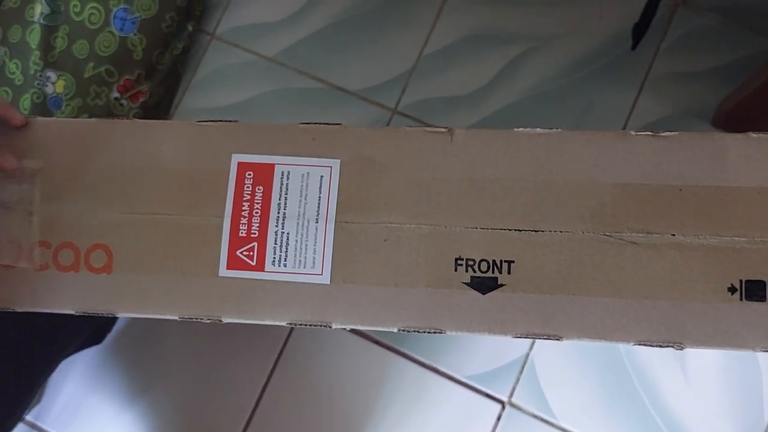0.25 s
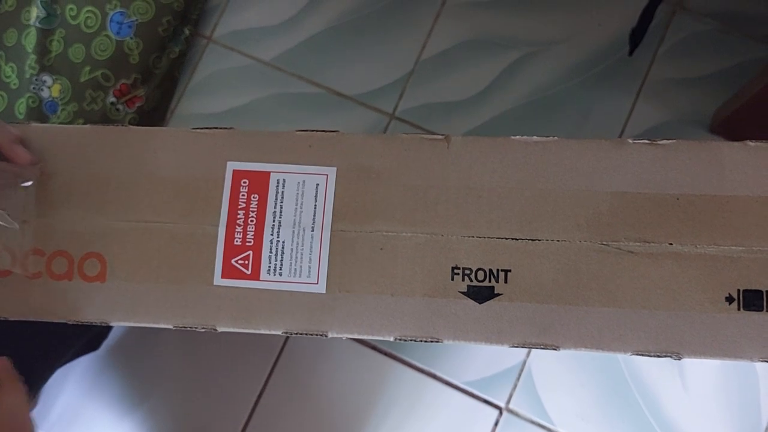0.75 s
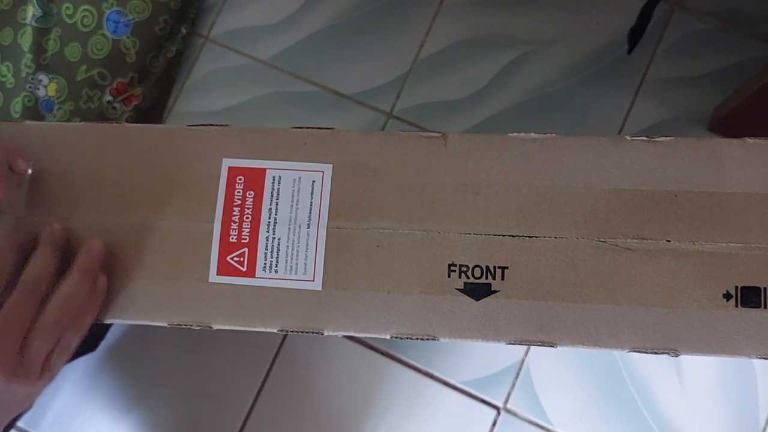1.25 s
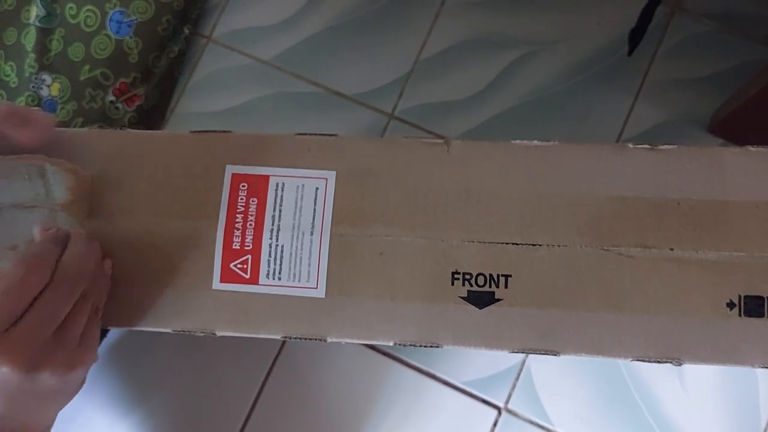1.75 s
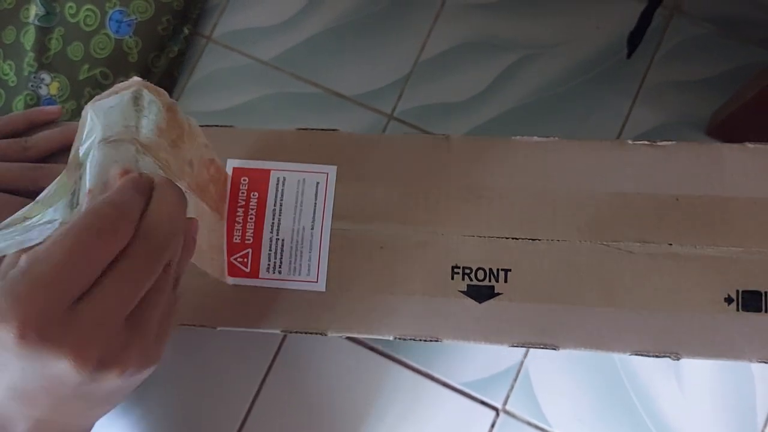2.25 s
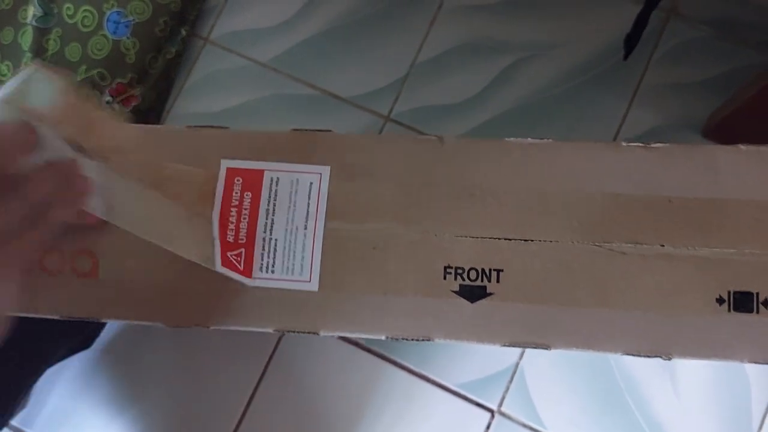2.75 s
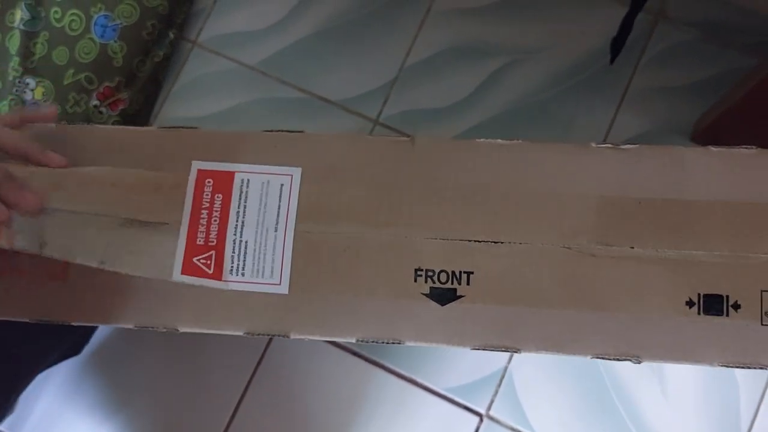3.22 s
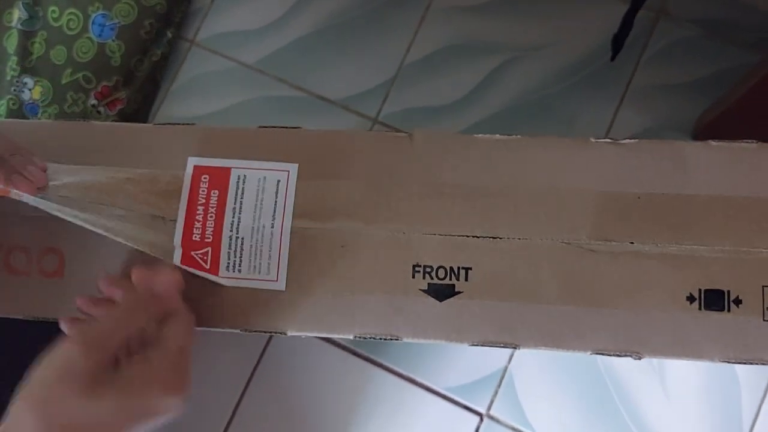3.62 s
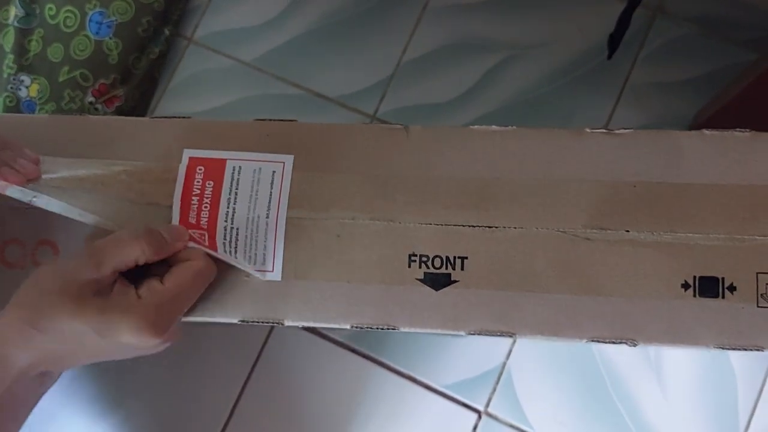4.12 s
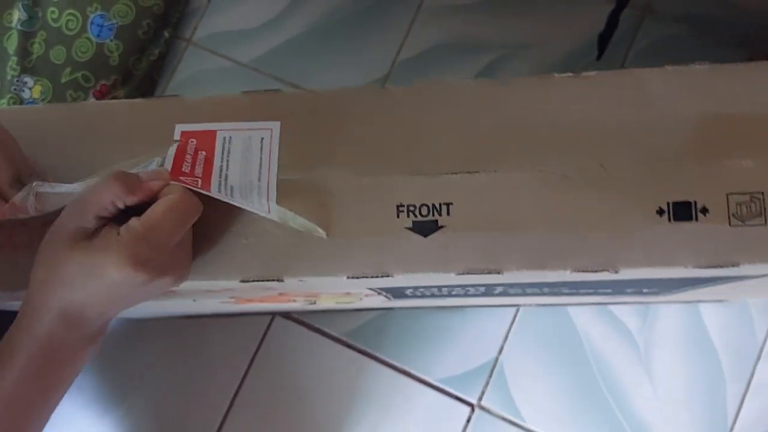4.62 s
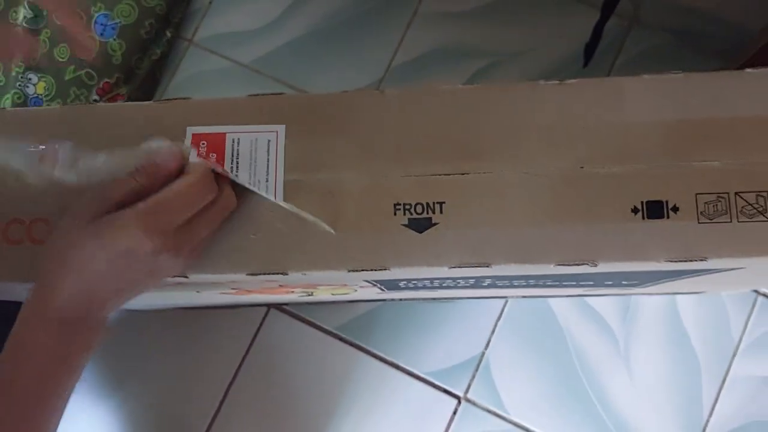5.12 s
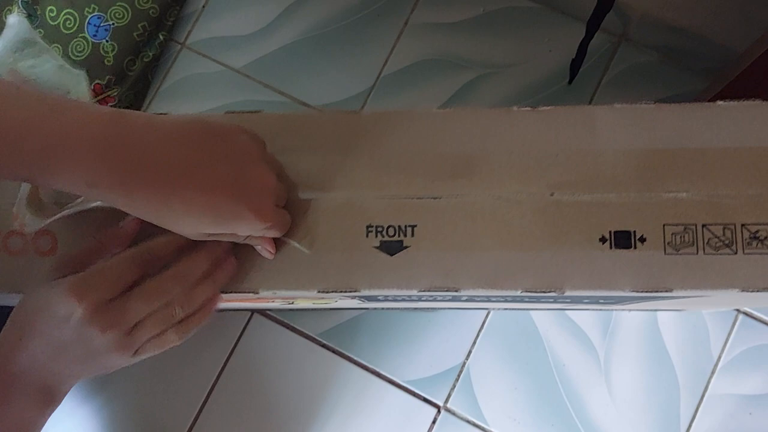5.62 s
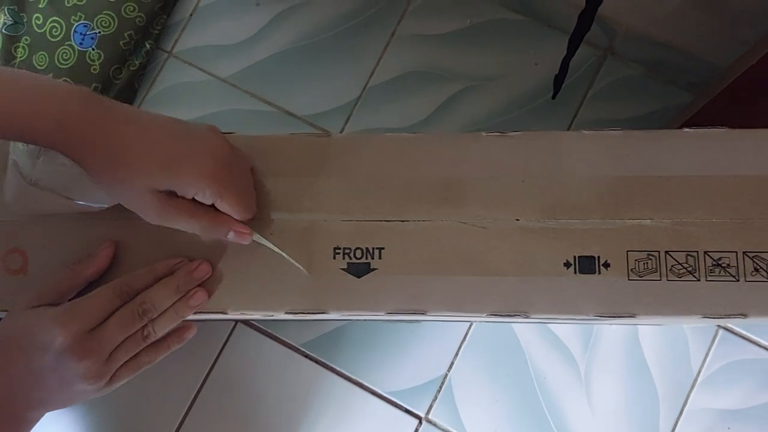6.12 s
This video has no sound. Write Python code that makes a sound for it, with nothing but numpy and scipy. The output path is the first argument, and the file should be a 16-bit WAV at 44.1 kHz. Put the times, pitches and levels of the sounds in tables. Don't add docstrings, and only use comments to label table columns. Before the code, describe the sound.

Packing tape crackles and is ripped in two loud bursts off a hollow cardboard box, then peeled in shorter pulls, in a tiled room.

```python
import sys
import numpy as np
from scipy import signal
from scipy.fft import rfft, irfft
from scipy.io import wavfile
from scipy.ndimage import uniform_filter1d

SR = 44100
rng = np.random.default_rng(int(sys.argv[2]) if len(sys.argv) > 2 else 0)


def makeup_ratio(level_db):
    decades = np.asarray(level_db, float) / 20
    return 10 ** decades


def file_out(sig):
    cols = np.atleast_2d(sig).T
    lim = np.clip(cols, -1, 1)
    pcm = np.round(lim * 32767).astype(np.int16)
    wavfile.write(sys.argv[1], SR, pcm)


N = 280917


def evened(x):
    return x / np.sqrt(np.mean(x ** 2) + 1e-20)


def smoothed(x, first, second, axis=-1):
    return uniform_filter1d(uniform_filter1d(x, first, axis), second, axis)


def read(points, hz):
    f, value = np.transpose(points)
    return np.interp(np.log(hz + 1), np.log(f + 1), value)


def follow(points, t):
    return np.interp(t, *np.transpose(points))


def add(mix, s, sound):
    part = mix[round(s * SR):][:len(sound)]
    part += sound[:len(part)]


def ring(x, modes):
    t = np.arange(8192) / SR
    body = np.zeros(len(t))
    for hz, width, db in modes:
        decay = np.exp(-np.pi * width * t)
        body += makeup_ratio(db) * np.sqrt(width) * decay * np.sin(2 * np.pi * hz * t)
    return signal.oaconvolve(x, body / np.linalg.norm(body))[:N]


def colour(x, points):
    gain_db = read(points, abs(np.fft.fftfreq(4096, 1 / SR)))
    log_gain = np.log(makeup_ratio(np.maximum(gain_db, -70)))
    taps = np.fft.ifft(np.exp(np.conj(signal.hilbert(log_gain)))).real[:2048]
    return signal.oaconvolve(x, taps / np.linalg.norm(taps))[:N]


# frequency in Hz, level in dB per Hz.
RUMBLE_SPECTRUM = [(18, -41), (40, -12.5), (133, 0), (173, -12.5), (243, -10), (350, -21.5), (560, -34),
                   (1290, -37.5), (2360, -48.5), (3490, -48.5), (14000, -46), (15500, -44.5)]
# frequency in Hz, width in Hz, lift in dB.
AIR_MODES = [(66.7, 23, 13.5), (108, 13, 4.5)]
# frequency in Hz, likeness (1 is the same).
PORT_LIKENESS = [(60, 0.93), (180, 0.75), (550, 0.5), (1650, 1), (4970, 6), (15000, -2)]
# time in seconds, level in dB.
RUMBLE_SWELL = [(0, -0.5), (.3, 1), (.9, -1.5), (1.4, -2), (2.1, -0.5), (2.6, -6.5), (3.1, -1), (3.6, 0.5),
                (4.198, 0), (4.9, 0), (5.15, 0.5), (5.7, 2), (6.1, -1.5), (6.37, 3)]


def rumble():
    level_db, patch_db = -50.5, 1.1
    hz = np.fft.rfftfreq(2048, 1 / SR)
    a, b, c, d, patches = rng.standard_normal((N // 512 + 6, len(hz), 5)).T
    patches = evened(smoothed(smoothed(patches, 6, 1, 0), 6, 1, 1))
    same = np.clip(read(PORT_LIKENESS, hz), -1, 1)[:, None]
    left = a + 1j * b
    right = same * left + np.sqrt(1 - same ** 2) * (c + 1j * d)
    lift_db = sum(db * np.exp(-((hz - f) / width) ** 2) for f, width, db in AIR_MODES)
    gain = makeup_ratio((read(RUMBLE_SPECTRUM, hz) + lift_db)[:, None] + patch_db * patches)
    noise = signal.istft(np.array([left, right]) * gain, nperseg=2048, noverlap=1536)[1][:, :N]
    return makeup_ratio(level_db + follow(RUMBLE_SWELL, np.arange(N) / SR)) * evened(noise)


# frequency in Hz, t60 in seconds.
ROOM_T60 = [(100, 0.21), (500, 0.36), (2000, 0.24), (6000, 0.2), (15000, 0.011)]
# delay in ms, level in dB.
TILE_ECHOES = [
    [(.6, -25), (2.0, -13), (3.7, 3), (5.6, -3), (9, -30.5)],
    [(.9, -1.5), (1.7, 10.5), (3.1, -29), (6.3, 1.5), (8, 1.5)],
]


def room(x):
    tail_db, echo_db = -11, -10
    taps = np.zeros((2, SR // 2))
    slots = np.arange(300, SR // 2 - 20, 20)
    at = slots + rng.integers(0, 20, (2, len(slots)))
    np.put_along_axis(taps, at, rng.choice([-1., 1.], at.shape), 1)
    hz, t, z = signal.stft(taps, SR, nperseg=256)
    tail = signal.istft(z * makeup_ratio(-60 * t / read(ROOM_T60, hz)[:, None]), SR, nperseg=256)[1]
    tail *= makeup_ratio(tail_db) / np.linalg.norm(tail[0])
    for port, echoes in zip(tail, TILE_ECHOES):
        for ms, db in echoes:
            add(port, ms / 1000, makeup_ratio(np.array([db + echo_db])))
    bass = signal.lfilter(*signal.butter(1, 700, fs=SR), x)
    return signal.fftconvolve((x - bass)[None], tail, axes=1)[:, :N]


# start in seconds, peak in dB, push length in seconds.
THUMPS = [(1.364, -25, 0.0035), (1.597, -27.5, 0.0036), (1.639, -18, 0.0025), (1.879, -12.5, 0.0043),
          (1.932, -19, 0.0014), (1.944, -7, 0.0036), (1.979, -18, 0.0069), (2.842, -61.5, 0.0044),
          (3.329, -23, 0.0026), (3.599, -35.5, 0.0096), (4.377, -38.5, 0.0043), (4.858, -22, 0.0038),
          (4.9, -34, 0.0021), (4.868, -31, 0.0088), (4.888, -28, 0.0071), (4.955, -26, 0.0035),
          (5.188, -30.5, 0.0056), (5.418, -26.5, 0.0077), (5.43, -25.5, 0.0061), (5.674, -29, 0.0049),
          (5.746, -29.5, 0.0054)]
# start in seconds, pitch in Hz, level in dB, length in seconds.
SQUEAKS = [(2.235, 1140, -58, .04), (4.21, 1200, -60, .07), (3.06, 2300, -58, .09),
           (5.935, 2130, -59, .035), (5.975, 1760, -63, .06), (6.04, 1700, -67, .08),
           (5.52, 1850, -70, .045), (6.18, 1350, -66, .12), (3.192, 2350, -65, .014), (.42, 1800, -75, .1),
           (1.908, 1150, -30, .014), (4.555, 640, -57, .055)]
# frequency in Hz, width in Hz, level in dB.
BOOM_MODES = [(86, 60, 3.5), (116.2, 9.1, 5), (170, 28, -1.5), (245, 16, -10.5)]


def hands():
    push, squeak = np.zeros(N), np.zeros(N)
    for at, peak_db, length in THUMPS:
        in_then_out = np.sin(np.linspace(0, 2 * np.pi, max(round(length * SR), 20)))
        add(push, at, makeup_ratio(peak_db - 1.5) * in_then_out)
    for at, hz, db, length in SQUEAKS:
        skin = [(hz, 150, 0)]
        rub = evened(ring(ring(rng.standard_normal(9000), skin), skin))
        rub = rub[4000:][:round(length * SR)]
        add(squeak, at, makeup_ratio(db) * rub * signal.windows.tukey(len(rub), .6))
    return ring(push, BOOM_MODES) / 10 + squeak


# frequency in Hz, width in Hz, level in dB.
WALL_MODES = [(464, 28, 3.5), (492, 17, -4), (564, 36, 4.5), (632, 24, -5.5), (700, 130, -2.5),
              (870, 1400, 1.5)]
# frequency in Hz, width in Hz, level in dB.
HOLLOW_MODES = [(260, 30, -4), (300, 22, 0), (343, 22, 1), (395, 45, -13)]
# frequency in Hz, width in Hz, level in dB.
SLACK_HOLLOW_MODES = [(164, 19, -3.5), (218, 30, 0), (252, 27, 3), (280, 40, -4.5)]
# time in seconds, share from 0 to 1.
SLACK_SHARE = [(0, 0.64), (1.3, 0.4), (1.55, 0.65), (1.7, 0.64), (1.85, 0.57), (1.95, 0.06), (2.3, 0.16),
               (2.9, 0.97), (3.3, 0.48), (4.2, .8), (4.9, 0.7), (5.4, 0.97), (5.7, 0.46), (6.25, 1)]


def hollow_box(walls, hollow, shared, other):
    boom_db = -9
    slack = np.clip(follow(SLACK_SHARE, np.arange(N) / SR), 0, 1)
    no_bass = signal.butter(3, 240, "high", fs=SR, output="sos")
    firm = signal.sosfilt(no_bass, ring(hollow * shared, HOLLOW_MODES))
    loose = ring(np.sqrt(slack) * hollow * other, SLACK_HOLLOW_MODES)
    cavity = np.sqrt(1 - slack) * firm + loose
    return ring(walls * shared, WALL_MODES) + cavity + makeup_ratio(boom_db) * ring(hollow * shared, BOOM_MODES)


# frequency in Hz, width in Hz, level in dB.
FACE_MODES = [(1030, 91, 1.5), (1200, 81, 12), (1386, 360, 17.5), (1718, 120, 17.5), (1840, 380, 9),
              (2247, 250, 10), (2350, 140, 8)]
# frequency in Hz, width in Hz, level in dB.
LABEL_MODES = [(1520, 180, 9), (1774, 150, 15.5), (2085, 120, -4), (2660, 170, -30), (2780, 89, -27)]
# from and to, in seconds.
LABEL_REACHED = (5.3, 5.7)


def card_face(push):
    on_label = np.interp(np.arange(N) / SR, LABEL_REACHED, (0, 1))
    return ring(push * np.sqrt(1 - on_label), FACE_MODES) + ring(push * np.sqrt(on_label), LABEL_MODES)


# frequency in Hz, level in dB per Hz.
FILM_SPECTRUM = [(1350, -32), (2300, 2), (2470, -4.5), (3060, -7), (4150, -3), (5900, -8.5), (12200, -7),
                 (16000, -6.5)]


def plastic_film(film, sheen, shared, other):
    same = 0.4
    grains = np.array([shared, same * shared + np.sqrt(1 - same ** 2) * other])
    dull = signal.sosfiltfilt(signal.butter(2, 7000, fs=SR, output="sos"), grains)
    ports = [colour(film * low + sheen * (grain - low), FILM_SPECTRUM) for grain, low in zip(grains, dull)]
    return np.array(ports)


def flexed(x):
    depth_db = 2.1
    z = signal.stft(x, nperseg=256, noverlap=192)[2]
    field = rng.standard_normal(z.shape[1:])
    field = smoothed(smoothed(field, 3, 3, 0), 30, 30, 1)
    gain = makeup_ratio(depth_db * evened(field))
    return signal.istft(z * evened(gain), nperseg=256, noverlap=192)[1][:, :N]


def slips(per_s, spread_db, clump_db, hiss):
    size = makeup_ratio(spread_db * np.minimum(rng.exponential(1, N), 3))
    size = size * (rng.random(N) < per_s / SR)
    burst = np.exp(-np.arange(200) / (.0006 * SR))
    clumps = evened(smoothed(rng.standard_normal(N), 500, 300))
    grain = evened(signal.oaconvolve(size, burst)[:N])
    return (hiss + grain) / np.sqrt(hiss ** 2 + hiss + 1) * makeup_ratio(clump_db * clumps)


# start in seconds, peak in dB, top sheen in dB, t60 in seconds.
TICKS = [(0.171, -31, -2.5, 0.01), (0.2301, -22, -19, 0.057), (0.2698, -25, -27, 0.04),
         (0.29, -22, -8, 0.027), (1.4417, -51.5, 12, 0.024), (1.5438, -10, -33, 0.0091),
         (1.5751, -11.5, -20.5, .012), (2.1096, -51, 5, 0.085), (2.2609, -41.5, -6.5, 0.11),
         (2.918, -32.5, -9, 0.093), (2.99, -36.5, -32, .011), (3.041, -24.5, -13, 0.012),
         (3.1441, -29.5, -9, 0.011), (3.2962, -29, -25, 0.044), (3.8969, -34, 7, 0.0095),
         (4.3088, -24.5, -16, 0.047), (4.4694, -25, 0, 0.029), (4.774, -47, 2.5, 0.026),
         (4.7921, -37.5, 2, 0.02285), (4.8439, -32, -5.5, 0.074), (4.916, -19.5, -11.5, 0.012),
         (5.0414, -38, -3, 0.042), (5.091, -40, -14.5, 0.026), (5.2949, -40.5, -3.5, 0.092),
         (5.882, -40, -4, 0.017), (5.918, -37, 1, .022), (5.9799, -28, -30, 0.017),
         (6.0474, -34.5, -26, .02), (6.1835, -47, -29, .032), (6.218, -36.5, 0, 0.11)]
# start in seconds, peak in dB, top sheen in dB, card face share in dB.
SNAPS = [(0.144, -47, -8, -27), (0.2032, -40, -16, -6), (0.317, -27, -3.5, -24), (0.4842, -38, -14, -12.5),
         (0.5945, -39, -13, -17.5), (1.0313, -48, 1, -10.5), (1.418, -37.5, -0.5, -13), (1.481, -34, 0, -9),
         (1.596, -12, -2, -1), (1.648, -21.5, -1, -15), (1.803, -24, -24, -28), (1.852, -23, -8, -10),
         (1.88, -8.5, -38, -11), (2.578, -56, 6.5, -11), (2.945, -38, -14, -19), (3.014, -44, -6, -11),
         (3.193, -43, -7, -7), (3.2187, -27.5, -11, -25), (3.237, -35, -20, -15),
         (3.2506, -25.5, -20.5, -19.5), (3.9584, -46.5, -16, -12), (4.2216, -21, -36, -17),
         (4.37, -29, 2, -4), (4.513, -36.5, -1, -6.5), (4.627, -40.5, -3, -9), (4.8924, -22, -41, -23.5),
         (5.176, -38, -18, -12), (5.4165, -61, -25, -8)]
# start in seconds, peak in dB, top sheen in dB, hollow box share in dB.
KNOCKS = [(0.051, -26, 7.5, -7), (0.0738, -41.5, 13, 8), (0.385, -36.5, -7, -3), (0.632, -37, -16, -9),
          (1.0886, -45, -14, 0), (1.314, -49.5, -2, -4), (1.3755, -57.5, 12, 18), (1.4655, -38.5, 6, -7),
          (2.8998, -42, 2, 11), (3.3134, -13, -4, -3), (3.6174, -49.5, -2, -2), (3.79, -48.5, -19, 0),
          (4.074, -52, -35, -5), (4.2595, -28.5, -5, -4.5), (4.379, -23, -7, -5.5), (5.19, -38, 6.5, 0.5),
          (5.418, -46, -24, 16), (5.458, -47.5, 4, -1), (5.674, -24, -7, -1.5)]
# start in seconds, peak in dB, top
# sheen in dB.
CRACKLES = [(0.445, -53, -19), (.466, -42.5, -24), (0.877, -59, 5), (.9264, -63, -9), (1.0147, -61, -10),
            (1.057, -50, -7), (1.1674, -59, 6), (1.3006, -64, -2), (1.585, -12, -23), (1.602, -20, -1),
            (1.609, -31, -6), (1.7223, -35, -6), (1.7316, -35, -6), (1.868, -14, -22), (1.892, -16, -27),
            (1.915, -5, -20), (3.366, -29, -1), (3.381, -41, -5), (3.844, -46.5, -5), (4.3323, -33, 0),
            (4.403, -34, -8), (4.41, -28.5, -15), (4.466, -36, 4), (4.547, -29.5, -14), (4.57, -42, -18),
            (5.5477, -49, -12), (5.555, -46, -12), (5.6367, -43, 2), (3.548, -50.5, -13.5),
            (3.665, -47, -11.5), (3.754, -53, -15), (4.954, -40, -10), (5.066, -43, -9), (5.33, -57, -8),
            (5.69, -31, -16), (5.702, -35.5, -24), (5.713, -43, -24)]


def cracks():
    ticks = [(s, db, -24, -57.5, t60, sheen_db) for s, db, sheen_db, t60 in TICKS]
    snaps = [(s, db, face_db, -40.5, 0.017, sheen_db) for s, db, sheen_db, face_db in SNAPS]
    knocks = [(s, db, -17, box_db, 0.027, sheen_db) for s, db, sheen_db, box_db in KNOCKS]
    crackles = [(s, db, -14.5, -31, 0.017, sheen_db) for s, db, sheen_db in CRACKLES]
    return ticks + snaps + knocks + crackles


# time in seconds, effort in dB.
FIDGET = [(0, -64.5), (.45, -63), (.8, -81.5), (1.05, -73), (1.22, -90.5), (1.36, -64.5), (2.17, -57),
          (2.33, -62), (2.47, -88), (2.65, -84), (2.9, -61.5), (3.4, -75), (3.51, -78.5), (3.68, -68),
          (4.0, -63.5), (4.76, -63), (5.05, -59), (6.37, -77)]
# top in seconds, effort in dB, rise and fall in seconds, card lift in dB.
PICKS = [
    (0, -50.5, .01, 0.058, -30),
    (.06, -55, .005, 0.35, -32),
    (0.227, -40.5, 0.029, 0.09, -10),
    (.275, -44.5, 0.063, 0.11, -8),
    (.71, -70.5, .01, 0.13, -10),
    (.885, -73.5, 0.015, 0.27, -6),
    (1.16, -72, 0.38, 0.034, 2),
    (1.376, -64.5, 0.039, 0.011, -3),
]
# top in seconds, effort in dB, rise and fall in seconds, card lift in dB.
PULLS = [(2.54, -71.5, 0.076, 0.22, -3), (2.8, -61, 0.23, 0.0063, -10.5), (2.826, -67.5, .004, 0.08, 9),
         (2.95, -55, 0.11, 0.098, -11.5), (3.049, -41, 0.0063, .15, -24), (3.141, -41.5, 0.14, 0.014, -74),
         (3.25, -48.5, 0.13, 0.22, -15), (3.319, -47, 0.093, 0.33, -40), (3.661, -61, 0.11, 0.17, -11.5),
         (4.12, -64, 0.059, .2, -16), (4.27, -51.5, 0.43, 0.26, -15), (4.43, -47.5, 0.31, 0.067, -11),
         (4.62, -48.5, 1, 0.17, -17), (4.699, -78, 0.58, 0.024, -25), (4.856, -46, 0.0092, 0.083, -2.5),
         (5.345, -54, 0.046, 0.048, -23), (5.419, -62, 0.0033, 0.097, 12), (5.449, -54.5, 0.026, 0.16, -5),
         (5.6, -53, 0.12, 0.61, -33), (5.69, -55, 0.084, 0.11, 6.5), (5.751, -64.5, 0.0041, 0.097, 9),
         (4.96, -56.5, 0.021, .05, 6), (5.875, -53.5, 0.026, 0.38, -62), (6.184, -48.5, .005, 0.78, -27),
         (6.36, -49.5, 0.49, 0.11, -31)]
# time in seconds, effort in dB, lift of the card in dB, squeeze of the box in dB.
RIPS = [
    [(1.39, -64.5, -2.5, -6.5), (1.47, -42, -8.5, -1), (1.562, -37.5, -7.5, -5), (1.597, -21, -5, -3.5),
     (1.69, -44, -11.5, 0.5), (1.705, -42.5, -1.5, -8.5), (1.784, -33, -3, -15), (1.83, -47, -7, -10.5)],
    [(1.84, -38, -9, -4.5), (1.884, -25, -2.5, -4), (1.93, -17.5, -7.5, -13.5), (1.94, -22.5, -19, 11),
     (1.956, -19.5, -6.5, 3), (2.044, -46.5, -5, 2), (2.14, -55, -11.5, 2)],
]


def effort(t):
    edge_db, curve = -25.5, 1.83

    def drive(db, lift_db):
        shares_db = np.array([[0], [-2.5 + 0.2 * lift_db], [lift_db], [lift_db + 0.5]])
        return makeup_ratio(db + shares_db) ** 2

    between_rips = (t > RIPS[0][0][0]) & (t < RIPS[-1][-1][0])
    power = drive(follow(FIDGET, t), -12) * ~between_rips
    for top, db, rise, fall, lift_db in PICKS + PULLS:
        away = np.where(t < top, (top - t) / rise, (t - top) / fall)
        power += drive(db + edge_db * away ** curve, lift_db)
    s, *controls = np.vstack(RIPS).T
    db, lift_db, squeeze_db = (np.interp(t, s, c) for c in controls)
    walls_db = lift_db + 1 + 0.47 * (db + 23.0)
    rip = makeup_ratio(db + np.array([0 * db, lift_db, walls_db, squeeze_db]))
    return np.sqrt(power + between_rips * rip ** 2)


# time in seconds, sheen in dB.
FILM_SHEEN = [(0, 3.5), (2.3, 0), (2.55, 16), (2.75, 5.5), (3.1, -9), (3.35, -2.5), (3.9, -1), (4.6, 3),
              (5.3, -1), (6.37, 0)]


def tape():
    t = np.arange(N) / SR
    levels = np.repeat(effort(t[::16]), 16, axis=1)[:, :N]
    fast = levels[0] / makeup_ratio(-34)
    film, face, walls, hollow = levels * slips(per_s=500, spread_db=4.3, clump_db=1.4, hiss=.85 + fast)
    sheen = film * makeup_ratio(follow(FILM_SHEEN, t))
    u = np.arange(3000) / SR
    onset = np.minimum(u / .0003, 1)
    tick = 3.3 * np.exp(-u / .0008)
    for at, peak_db, face_db, box_db, t60, sheen_db in cracks():
        tail = makeup_ratio(-60 * u / np.clip(t60, .004, .1))
        crack = makeup_ratio(peak_db - 9.5) * (tail + tick) * onset
        add(film, at, crack)
        add(sheen, at, crack * makeup_ratio(sheen_db + 2))
        add(face, at, crack * makeup_ratio(face_db + 11))
        add(walls, at, crack * makeup_ratio(box_db - 8.0))
        add(hollow, at, crack * makeup_ratio(box_db - 3.0))
    shared, other = rng.standard_normal((2, N))
    strip = plastic_film(film, sheen, shared, other) + card_face(face * shared)
    return flexed(strip), hollow_box(walls, hollow, shared, other)


def later(x, samples):
    return x[np.maximum(np.arange(N) - np.round(samples).astype(int), 0)]


# time in seconds, lag of the right port in ms.
RIGHT_LAG = [(0, 0.48), (1.2, 0.31), (1.7, 0.4), (2.701, 0.4), (4.201, 0.43), (5.001, 0.16), (6.4, 0.21)]
# time in seconds, left over right in dB.
LEFT_LEAN = [(0.0, 2), (0.85, 2), (2.45, -3), (2.5, -2), (3.34, 1.5), (4.43, -1.5), (4.91, 2), (5.55, -1),
             (6.37, -1)]


def scene():
    (left, right), box = tape()
    box = signal.sosfilt(signal.butter(4, 85, "high", fs=SR, output="sos"), box + hands())
    t = np.arange(N) / SR
    lag = follow(RIGHT_LAG, t) * SR / 1000
    left_gain, right_gain = makeup_ratio(np.outer([.5, -.5], follow(LEFT_LEAN, t)))
    at_left = left_gain * left + box
    at_right = right_gain * later(right, 0.93 * lag) + later(box, 0.42 * lag)
    drift = evened(smoothed(rng.standard_normal(N), 6000, 6000))
    bounced = np.interp(np.arange(N) - .25 * SR / 1000 * drift, np.arange(N), left)
    return makeup_ratio(-0.5) * (np.array([at_left, at_right]) + room(bounced + box)) + rumble()


def band_limit(x):
    return signal.sosfilt(signal.butter(12, 16980, fs=SR, output="sos"), x)


# frequency in Hz, left over right in dB.
PORT_COLOUR = [(60, -4), (150, 0), (380, 0), (950, -0.5), (2380, 4), (5980, 4.5), (15000, 4.5)]
# frequency in Hz, gain in dB.
BAND_EDGE = [(15800, 0), (16050, -60)]
# frequency in Hz, gain in dB.
TOP_LIMIT = [(16700, 0), (16850, -70)]


def record(dry):
    sudden_db, top_db = 10, -15
    hz = np.fft.rfftfreq(N, 1 / SR)
    bass_cut = np.sqrt(1 + (58 / (hz + 1)) ** 10)
    tilt = makeup_ratio(np.outer([.5, -.5], read(PORT_COLOUR, hz))) / bass_cut
    heard = irfft(rfft(dry) * tilt * makeup_ratio(1.0), N)
    heard = .9 * np.tanh(heard / .9)
    body = irfft(rfft(heard) * makeup_ratio(read(BAND_EDGE, hz)), N)
    top = heard - body
    power = (top ** 2).mean(0)
    before = np.roll(uniform_filter1d(power, 600), 400)
    sudden = uniform_filter1d(power, 128) > makeup_ratio(2 * sudden_db) * before
    gate = np.minimum(6 * smoothed(1. * sudden, 200, 100), 1)
    mix = irfft(rfft(body + makeup_ratio(top_db) * gate * top) * makeup_ratio(read(TOP_LIMIT, hz)), N)
    return band_limit(mix)


dry = scene()
out = record(dry)
file_out(out)
```